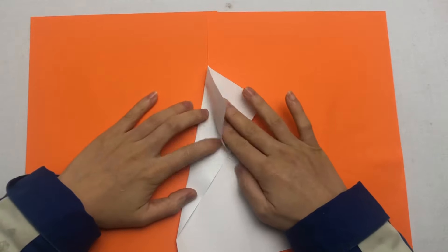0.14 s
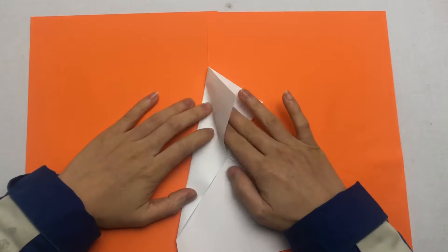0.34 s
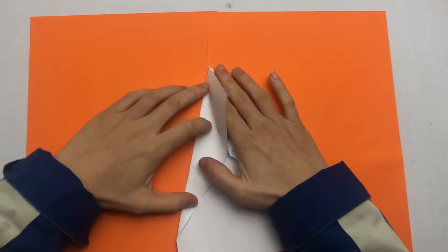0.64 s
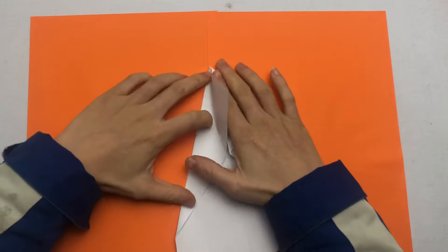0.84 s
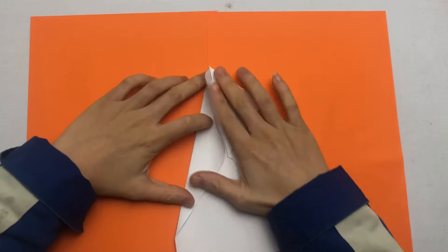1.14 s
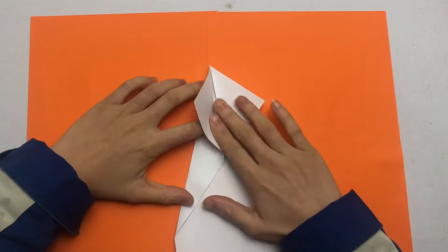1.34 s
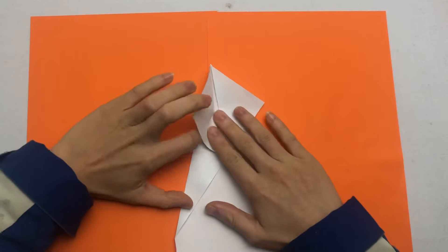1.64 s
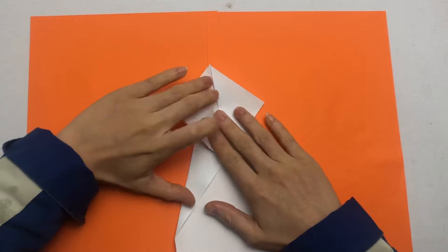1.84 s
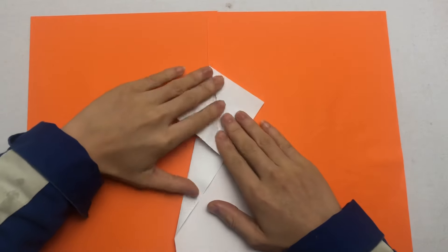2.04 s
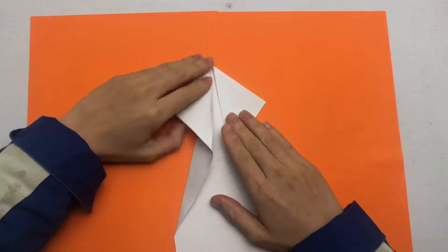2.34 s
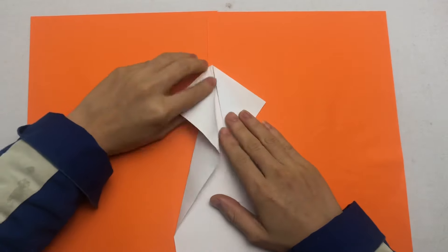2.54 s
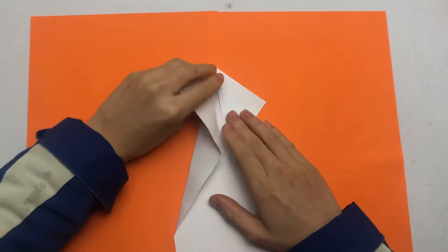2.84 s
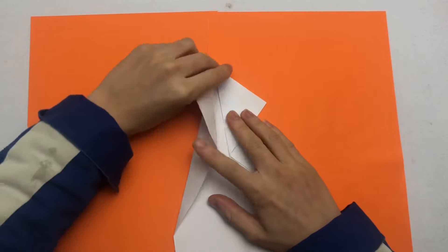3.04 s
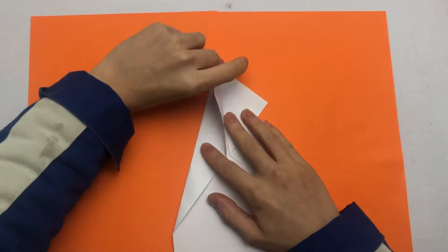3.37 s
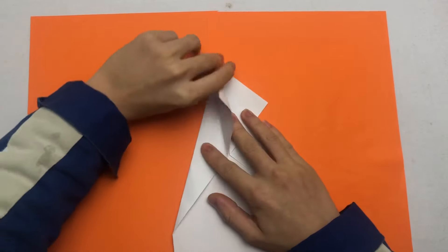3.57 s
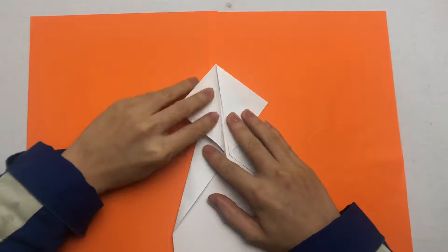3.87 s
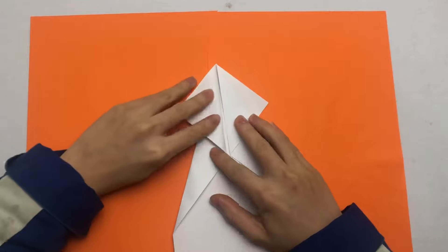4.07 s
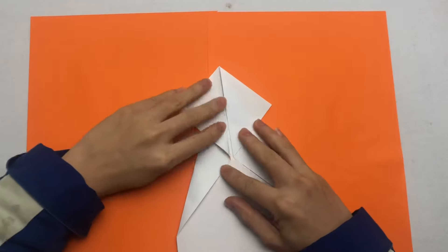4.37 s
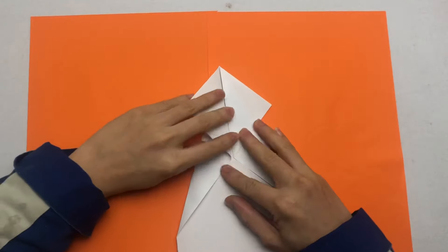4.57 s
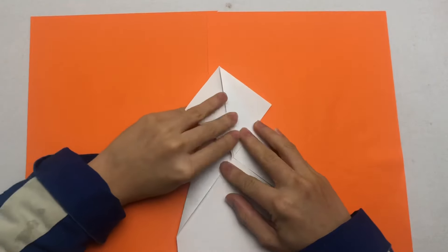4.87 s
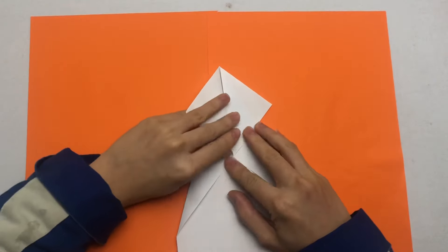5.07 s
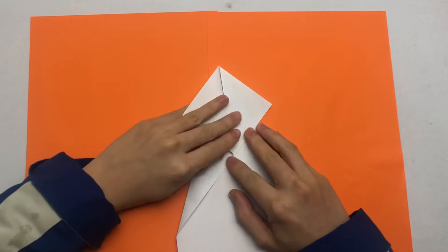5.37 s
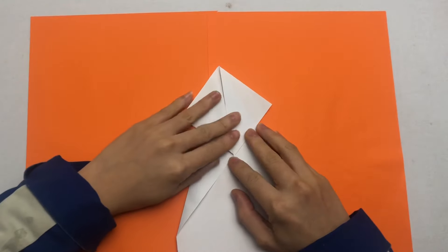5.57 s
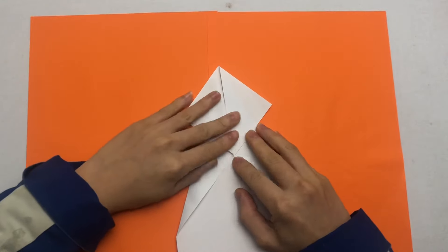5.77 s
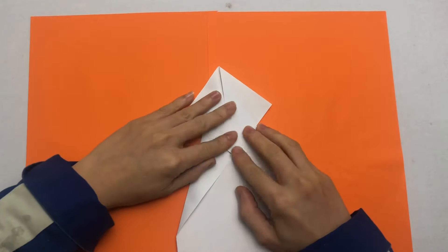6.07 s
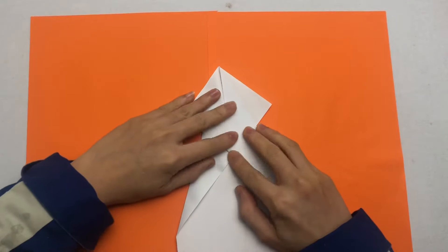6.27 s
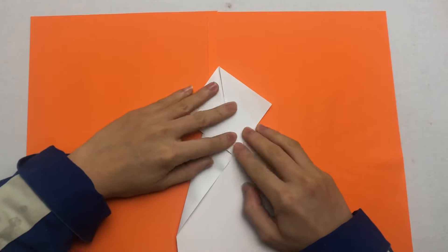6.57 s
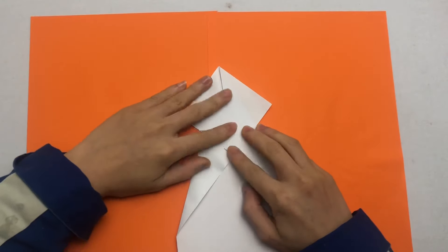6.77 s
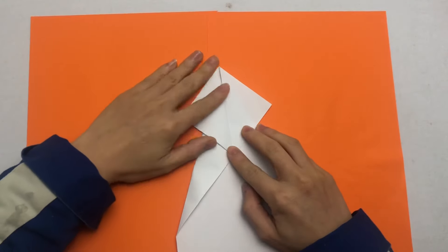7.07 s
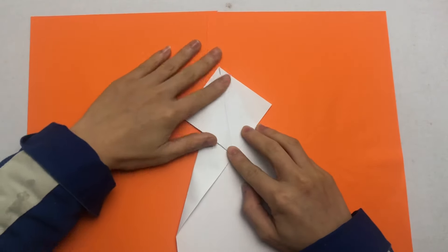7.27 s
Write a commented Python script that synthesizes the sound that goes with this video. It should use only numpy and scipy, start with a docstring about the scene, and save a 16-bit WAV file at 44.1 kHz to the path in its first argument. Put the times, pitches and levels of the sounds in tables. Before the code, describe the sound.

Two hands fold and press a sheet of paper on a table, heard close in a small quiet room. Brisk papery swishes and low hand rumble come first, then crackles, a sharp pop around two seconds and a dull table knock just after. Later the rubbing becomes softer and lighter, with a few small ticks and snaps.

```python
"""A fine-grained hiss of skin on paper comes first: two hands fold a sheet on a table, close to one microphone.
Sliding is a crowd of tiny random slips, coloured by hollows under the hands and shaped stroke by stroke.
The sheet snaps and its creases crunch as jolts and bursts of small breaks ring its resonances.
Underneath, the hands rumble, drag and knock on a ringing table top, and fingertips chatter.
The small, quiet room adds a faint diffuse tail to the paper."""
import sys
import numpy as np
from scipy import signal
from scipy.fft import rfft, irfft
from scipy.io import wavfile
from scipy.ndimage import uniform_filter1d

SR = 44100
rng = np.random.default_rng(int(sys.argv[2]) if len(sys.argv) > 2 else 0)


def materialize(psi):
    """Save the field psi as 16-bit PCM at rate SR to the path in sys.argv[1].

    A 1-D psi becomes a single channel; in a 2-D psi each row is a channel.
    """
    bounded = np.clip(np.atleast_2d(psi).T, -1, 1)
    quanta = np.round(bounded * 32767).astype(np.int16)
    wavfile.write(sys.argv[1], SR, quanta)


N = 326776
TIME, FREQS = np.arange(N) / SR, np.fft.rfftfreq(N, 1 / SR)


def amp(db):
    """Decibels to gain."""
    return 10 ** (np.asarray(db) / 20)


def evened(x):
    """Scales to rms 1."""
    return x / np.sqrt(np.mean(x ** 2) + 1e-20)


def decay(t, t60):
    """A fade that loses 60 dB in t60 seconds."""
    return np.exp(-np.log(1000) * t / t60)


def read(points, hz):
    """Reads a curve over frequency on a log-frequency axis."""
    f, value = np.transpose(points)
    return np.interp(np.log(hz + 1), np.log(f + 1), value)


def add(mix, s, sound):
    """Mixes a sound in at s seconds."""
    part = mix[max(round(s * SR), 0):][:len(sound)]
    part += sound[:len(part)]


def coloured(x, gain):
    """Filters by a gain for each frequency; rms 1."""
    return evened(irfft(rfft(x) * gain, N))


def waver(hz):
    """Slow random drift of rms 1, up to about hz."""
    return coloured(rng.standard_normal(N), 1 / (1 + (FREQS / hz) ** 4))


def resonate(x, hz, width_hz):
    """A resonance of gain 1 at a fixed or moving frequency: shift to 0 Hz, smooth, shift back."""
    turn = np.exp(2j * np.pi * np.cumsum(hz * np.ones(len(x))) / SR)
    r = np.exp(-np.pi * width_hz / SR)
    smoothed = signal.lfilter([1 - r], [1, -r], x / turn)
    return 2 * (turn * smoothed).real


def friction(per_s, spread_db, smooth):
    """Tiny slips of uneven size over a smooth hiss."""
    sizes = amp(spread_db * np.minimum(rng.exponential(1, N), 4)) * rng.choice([-1, 1], N)
    slips = evened(sizes * (rng.random(N) < per_s / SR))
    return evened(slips + smooth * rng.standard_normal(N))


# how long the room rings at each pitch: (f/Hz, t60/s)
ROOM_DECAY = [(1000, 0.8), (4000, 0.55), (9000, 0.38), (16000, 0.84)]


def room(x, gap_s=0.0029):
    """A diffuse noise tail after a short gap, with its own decay time at each frequency."""
    hz, t, z = signal.stft(rng.standard_normal(SR // 2), SR, nperseg=256)
    tail = signal.istft(z * decay(t, read(ROOM_DECAY, hz)[:, None]), SR, nperseg=256)[1]
    tail[:round(gap_s * SR)] = 0
    return signal.fftconvolve(x, tail / np.linalg.norm(tail))[:N]


# ringing modes of the table top: (f/Hz, relative level/dB, t60/s)
TABLE_MODES = [(54.7, -9.5, 0.39), (73.8, 0.5, 0.28), (87.8, 7.5, 0.29), (108.4, -2.5, 0.79),
               (126.8, -8.5, 0.66), (143.3, 4.5, 0.31), (162, -4, 0.3), (227, 7, 0.11), (273.5, 7.5, 0.14),
               (316, 2, 0.065), (396, 4.5, 0.19), (451, 14.5, 0.073), (650, 16, 0.039)]


def table_thud(contact_s):
    """The table top's answer to one soft push; the longer the contact, the duller."""
    t = np.arange(SR // 2) / SR
    ring = np.zeros(len(t))
    for k, (hz, db, t60) in enumerate(TABLE_MODES):
        ring += (-1) ** k * amp(db) * decay(t, t60) * np.sin(2 * np.pi * hz * t)
    push = np.sin(np.pi * np.minimum(t / contact_s, 1)) ** 2
    return signal.fftconvolve(ring, push)


# a hand leans on the table: (start t/s, length t/s, rumble level/dB)
HAND_LEANS = [(0.184, 0.11, -51.5), (0.475, 0.2, -51), (0.709, 0.16, -50), (0.968, 0.031, -51),
              (1.066, 0.22, -51), (1.748, 0.14, -56.5), (2.029, 0.065, -56), (2.87, 0.48, -60.5),
              (3.44, 0.24, -59), (4.395, 0.37, -60.5), (5.06, 0.13, -56), (5.324, 0.17, -53.5),
              (5.69, 0.059, -51), (6.12, 0.23, -60.5)]
LEAN_ATTACK_S, LEAN_T60_S, RESTING_WEIGHT_DB = 0.028, 0.34, -66


def weight_db():
    """The weight of the hands as a rumble level: each lean comes on quickly, holds and eases off."""
    power = amp(RESTING_WEIGHT_DB) ** 2 * np.ones(N)
    t = np.arange(SR) / SR
    for s, length_s, db in HAND_LEANS:
        lean = np.minimum(t / LEAN_ATTACK_S, 1) * decay(np.maximum(t - length_s, 0), LEAN_T60_S)
        add(power, s, (amp(db) * lean) ** 2)
    return 10 * np.log10(power)


# dull colour of dragging skin, also used by the chatters: (f/Hz, relative level/dB)
SKIN_COLOUR = [(110, -19), (160, 0), (230, 0.5), (340, -5), (430, -2), (560, -8.5), (1400, -20.5)]


def pressing(contact_s=0.0087, drag_db=-41, drag_share=0.41):
    """The hands shake the table top; the dull drag of the skin grows with their weight."""
    rumble_db = weight_db()
    rumble = coloured(rng.standard_normal(N), abs(rfft(table_thud(contact_s), N)))
    # flatten the chance swells, so that the overall level follows the weight
    rumble /= np.sqrt(uniform_filter1d(rumble ** 2, size=2400) + 0.035)
    # the fingers shift in small separate shoves
    rumble = evened(rumble * amp(1.5 * waver(12.0)))
    drag = coloured(rng.standard_normal(N), amp(read(SKIN_COLOUR, FREQS)) * (FREQS < 1400))
    # the drag gains only drag_share dB for each dB of rumble
    return amp(rumble_db) * rumble + amp(drag_db + drag_share * rumble_db) * drag


# a finger or the heel of a hand lands on the table, or a snap of the sheet jolts it: (t/s, peak level/dB,
# contact t/s)
HAND_KNOCKS = [(0.244, -51.5, 0.0042), (0.286, -41, 0.0079), (0.653, -48, 0.0036), (.76, -46, 0.0013),
               (0.786, -43.5, 0.0025), (1.176, -42, 0.0022), (1.473, -56, .002), (1.547, -48.5, 0.00071),
               (1.774, -50, 0.0015), (1.853, -43.5, 0.0022), (2.341, -28.5, 0.0039), (2.35, -33, 0.0054),
               (2.3996, -38.5, 0.0055), (2.457, -44, 0.005), (3.448, -45, 0.0062), (3.912, -48.5, 0.0092),
               (4.531, -49.5, 0.0037), (5.089, -51.5, 0.0044), (5.344, -50, 0.0022), (5.421, -48, 0.002),
               (5.473, -44.5, 0.0058), (5.722, -47, 0.0015), (6.02, -50.5, 0.0049), (6.268, -46, 0.0017),
               (6.65, -44, 0.0088), (6.663, -58, .0016), (6.706, -58, 0.0074), (7.085, -50.5, 0.012)]


def knocks():
    """Soft blows ring the table."""
    out = np.zeros(N)
    for s, db, contact_s in HAND_KNOCKS:
        thud = table_thud(contact_s)
        add(out, s, amp(db) * thud / abs(thud).max())
    return out


# a fingertip sticks and chatters briefly: (middle t/s, length t/s, level/dB, f/Hz)
FINGER_CHATTERS = [(0.201, 0.17, -62, 417), (0.582, 0.073, -58.5, 400), (0.65, 0.038, -64, 867),
                   (0.717, 0.026, -56, 880), (0.744, 0.078, -56, 323), (1.101, .085, -53.5, 413),
                   (1.189, 0.053, -52.5, 430), (6.175, 0.18, -76, 950)]


def chatters(groan_width_hz=100, squeak_width_hz=55, squeak_from_hz=700, scrape_share=0.81, scrape_tilt=0.24):
    """Uneven slips of skin on paper ring one narrow resonance; low ones also scrape in little bumps."""
    out = np.zeros(N)
    scrape_colour = amp(read(SKIN_COLOUR, FREQS)) * FREQS ** scrape_tilt * (FREQS < 1100)
    scrape = coloured(friction(per_s=280, spread_db=4.0, smooth=0.78), scrape_colour)
    for s, length_s, db, hz in FINGER_CHATTERS:
        slips = rng.standard_normal(round(length_s * SR))
        low = hz < squeak_from_hz
        width = groan_width_hz if low else squeak_width_hz
        # two passes make the resonance steeper
        voice = evened(resonate(resonate(slips, hz, width), hz, width))
        if low:
            voice += scrape_share * evened(scrape[round(s * SR):][:len(slips)])
        faded = voice * signal.windows.tukey(len(slips), .5)
        add(out, s - length_s / 2, amp(db) * evened(faded))
    return out


def patchy(x, depth_db, fade_hz=8000):
    """As the sheet bends, narrow resonances come and go at random, less so in the treble."""
    hz, _, z = signal.stft(x, SR, nperseg=1024)
    field = uniform_filter1d(rng.standard_normal(z.shape), size=4, axis=0)  # smooth over frequency
    field = uniform_filter1d(field, size=9, axis=1)  # smooth over time
    gain_db = depth_db * evened(field) / np.hypot(1, hz / fade_hz)[:, None]
    return signal.istft(z * amp(gain_db), nperseg=1024)[1][:N]


# a finger or a flap slides over the sheet, levels before the trim in sliding():
# (start t/s, length t/s, speeding up t/s, rasp level/dB, brightness level/dB)
SLIDE_STROKES = [(0.0, 0.31, 0.12, -53.5, 0.5), (0.245, 0.35, 0.077, -54, 1.5),
                 (0.388, 0.35, 0.13, -52.5, 0.05), (0.684, 0.31, 0.13, -54, -1.5),
                 (0.989, 0.48, 0.22, -49, 1.1), (1.37, 0.26, 0.091, -55, 0), (1.604, 0.082, .02, -58, 0.5),
                 (1.733, 0.081, 0.026, -50.5, 0), (1.737, 0.26, 0.016, -58.5, -0.5),
                 (1.885, 0.26, 0.16, -55, 0.5), (2.131, 0.28, 0.029, -54.5, -0.1),
                 (2.339, 0.57, .016, -59, 1), (2.561, 0.26, 0.031, -54, 1),
                 (2.731, 0.13, 0.12, -54.5, -0.7), (2.849, 0.58, 0.013, -62, -0.5),
                 (3.121, 0.23, 0.046, -57, -2), (3.457, 0.19, 0.018, -61, -1),
                 (3.602, 0.36, 0.014, -52.5, 1), (3.902, 0.63, 0.26, -61, 0.3), (4.34, 0.46, 0.086, -58, 1),
                 (4.507, 0.51, 0.3, -61, -1.2), (4.941, 0.1, 0.068, -59.5, 1),
                 (5.049, 0.093, 0.04, -59, -0.8), (5.082, 0.53, 0.42, -59, -0.5),
                 (5.724, 0.11, 0.013, -67, -1), (5.928, 0.14, 0.027, -63, 2),
                 (6.14, 0.07, 0.044, -59.5, 1.5), (6.238, 0.23, 0.049, -60, 0), (6.42, 0.46, 0.31, -61, 1),
                 (6.744, 0.44, 0.1, -57, 2), (6.925, 0.14, 0.058, -55, 1.3), (7.153, 0.55, 0.044, -58, 1.7)]
# hands lying almost still, before the same trim: level/dB of body, rasp, fine hiss
REST_LEVELS = [-72.5, -73.5, -74]
SAG_DB, STOP_S = 8, 0.1  # every stroke slows on its way, then comes to a stop
BODY_DB, BODY_PER_BRIGHT = -5, 3.4  # a light, bright stroke hardly moves the body of the sheet


def stroke_levels():
    """Body, rasp and fine hiss in dB: each stroke speeds up, slows and stops."""
    power = amp(REST_LEVELS)[:, None] ** 2 * np.ones(N)
    for s, length_s, rise_s, db, bright_db in SLIDE_STROKES:
        t = np.arange(0, length_s, 1 / SR)
        rise = np.sin(np.pi / 2 * np.minimum(t / rise_s, 1))
        stop = np.sin(np.pi / 2 * np.minimum((length_s - t) / STOP_S, 1))
        sag = amp(-SAG_DB * np.interp(t, [min(rise_s, length_s), length_s], [0, 1]))
        speed = rise * stop * sag
        tilts_db = (BODY_DB - BODY_PER_BRIGHT * bright_db, 0, bright_db)
        for band, tilt_db in zip(power, tilts_db):
            add(band, s, (amp(db + tilt_db) * speed) ** 2)
    return 10 * np.log10(power)


# a hollow under a hand or a lifted flap rings for one stroke:
# (middle t/s, length t/s, centre f/Hz, boost level/dB)
HOLLOWS = [(0.436, 0.32, 3900, 8), (2.42, 1, 8500, 4), (2.625, 0.45, 3080, 9), (2.85, 1, 1750, 9.5),
           (4.13, 0.066, 3650, 19), (4.237, 1, 3200, 6.5), (4.744, 1, 5160, 5.5), (5.196, 0.79, 1620, 8.5)]
HOLLOW_WANDER, WANDER_HZ = 0.028, 7.1  # the hollows change size as the hands move: rms share, rate
# colour of sliding paper: (f/Hz, relative level/dB)
PAPER_COLOUR = [(320, -42), (550, -8), (899, -10), (1020, -10.5), (1330, -8), (1620, -6.5), (2090, -9.5),
                (2580, -7), (3140, -5), (5510, -5), (7000, -4), (8500, -0.5), (10400, -4), (14500, -6.5),
                (15800, -13.5)]
# body, rasp and fine hiss of the slide: (low f/Hz, high f/Hz)
HISS_BANDS = [(500, 2300), (2300, 6500), (6500, 20000)]


def sliding(judder_db=1.56, judder_hz=20.7, patchy_db=2.2, trim_db=-0.5):
    """Paper fibres catch and slip; the hollows under hands and flaps colour the hiss."""
    slips = patchy(friction(per_s=3000, spread_db=3.5, smooth=2.16), depth_db=patchy_db)
    slips = slips * amp(judder_db * waver(judder_hz))
    hiss, shift = slips.copy(), 1 + HOLLOW_WANDER * waver(WANDER_HZ)
    for s, length_s, hz, db in HOLLOWS:
        swell = np.cos(np.pi * np.clip((TIME - s) / length_s, -.5, .5)) ** 2
        hiss += (amp(db) - 1) * swell * resonate(slips, hz * shift, width_hz=0.12 * hz)
    colour, out = amp(read(PAPER_COLOUR, FREQS)), np.zeros(N)
    for (lo, hi), level_db in zip(HISS_BANDS, stroke_levels()):
        band = 1 / (1 + (lo / (FREQS + 1)) ** 10) / (1 + (FREQS / hi) ** 10)
        out += amp(level_db + trim_db) * coloured(hiss, band * colour)
    return out


# resonances of the folded sheet: (f/Hz, width f/Hz, relative level/dB)
SHEET_MODES = [(1180, 230, -1.5), (1680, 210, 0), (2410, 240, -2.5), (3030, 570, 0.5), (3440, 480, 1),
               (3890, 240, -1.5), (5130, 250, -26), (7800, 5900, -9.5)]
# a snap or crunch comes back from nearby surfaces: (delay t/s, gain)
NEAR_ECHOES = [(.00132, 0.2), (.00185, 0.08), (.0039, .3)]
# body, crack and edge of a snap or crunch: (low f/Hz, high f/Hz)
CRACK_BANDS = [(950, 2000), (2000, 5000), (5800, 16000)]


def sheet(push, levels_db, detune, top_hz):
    """A push rings the sheet, whose resonances shift as it bends; near surfaces answer at once."""
    shifts = 1 + detune * (2 * rng.random(len(SHEET_MODES)) - 1)
    ring = sum(amp(db) * resonate(push, hz * k, width) for (hz, width, db), k in zip(SHEET_MODES, shifts))
    ring = signal.sosfilt(signal.butter(2, top_hz, fs=SR, output="sos"), ring)
    heard, out = ring.copy(), 0
    for delay_s, gain in NEAR_ECHOES:
        add(heard, delay_s * (1 + detune * rng.uniform(-1, 1)), gain * ring)
    for k, (band, db) in enumerate(zip(CRACK_BANDS, levels_db)):
        part = signal.sosfilt(signal.butter(2, band, "bandpass", fs=SR, output="sos"), heard)
        # the band's whole energy, spread over 10 ms, gives rms 1
        part = part * np.sqrt(SR / 100 / np.sum(part ** 2))
        out = out + (-1) ** k * amp(db) * part  # neighbouring bands have opposite polarity
    return out


# a crease gives way fibre by fibre, or a quick flick brushes the sheet, levels as rms over 10 ms: # (t/s, body
# level/dB, crack level/dB, edge level/dB, build-up t/s)
CREASE_CRUNCHES = [(0.979, -56, -68, -57, 0.0054), (1.234, -52.5, -54, -55, 0.012),
                   (1.5487, -45, -44.5, -43, 0.0095), (1.655, -72, -60, -53, 0.027),
                   (1.7694, -41, -55, -41, 0.0014), (1.849, -40, -46.5, -36.5, 0.0021),
                   (2.338, -51.5, -80, -49.5, 0.0011), (2.675, -53, -47, -62, 0.0058),
                   (2.784, -52.5, -67, -54, 0.0059), (2.834, -56, -57, -67, 0.03),
                   (3.137, -48.5, -76, -52.5, 0.0071), (3.155, -55, -58, -51.5, 0.014),
                   (3.184, -41, -55, -49.5, 0.012), (3.565, -54.5, -65, -59, 0.011),
                   (3.627, -47, -56, -49, 0.024), (3.655, -45.5, -62, -48, 0.039),
                   (3.752, -58.5, -56, -60, 0.0034), (3.9044, -61, -50, -53.5, 0.0079),
                   (4.14, -57, -48.5, -51.5, 0.0096), (6.388, -85, -89, -57, 0.022),
                   (6.858, -55.5, -80, -53, 0.0078)]


def crunches(release_t60=0.031):
    """A burst of small breaks swells until the crease gives or the flick passes, then dies."""
    out, t = np.zeros(N), np.arange(-SR // 20, SR // 20) / SR
    breaks = friction(per_s=5000, spread_db=3.0, smooth=0.32)
    for s, *levels_db, build_s in CREASE_CRUNCHES:
        swell = np.exp(2 * np.minimum(t, 0) / build_s) * decay(np.maximum(t, 0), release_t60)
        push = swell * breaks[round(s * SR):][:len(t)]
        add(out, s + t[0], sheet(push, levels_db, detune=0.049, top_hz=15500))
    return out


# the sheet buckles, levels as rms over 10 ms before the trim in snaps():
# (t/s, body level/dB, crack level/dB, edge level/dB, panel ring f/Hz)
SHEET_SNAPS = [(0.7586, -40.5, -42, -38, 1300), (1.472, -42, -32, -46, 2620),
               (2.038, -28.5, -28, -39.5, 1700), (2.1323, -37, -34.5, -57, 1720),
               (2.61, -53, -62, -45, 8350), (2.974, -50, -87, -70, 1500), (4.5263, -45.5, -42.5, -56, 1670),
               (4.614, -50, -58, -51, 1690), (5.825, -80, -92, -64.5, 9000),
               (6.2668, -46, -37.5, -43, 5500), (6.7144, -54, -55, -50, 2760)]


def snaps(jolt=1.1, flutter_t60=0.023, panel_db=6, panel_width=0.19, trim_db=-1):
    """The sheet flips through in one jolt, then flutters briefly; the panel that flips adds its own ring."""
    out, t = np.zeros(N), np.arange(SR // 20) / SR
    for s, *levels_db, hz in SHEET_SNAPS:
        flutter = rng.standard_normal(len(t)) * decay(t, flutter_t60)
        push = flutter / np.linalg.norm(flutter)
        push[0] += jolt  # size against the flutter
        push = push + (amp(panel_db) - 1) * resonate(push, hz, panel_width * hz)
        add(out, s, sheet(push, levels_db, detune=0.02, top_hz=9100))
    return amp(trim_db) * out


def scene(room_db=-13):
    """Paper with its room tail, and table, the same in both ears."""
    paper = snaps() + crunches() + sliding()
    mix = paper + amp(room_db) * room(paper) + pressing() + chatters() + knocks()
    return np.array([mix, mix])


def record(dry, bass_hz=50, edge_hz=15950):
    """The microphone sheds deep bass; then a steep low-pass limits the band."""
    thinned = signal.sosfilt(signal.butter(3, bass_hz, "highpass", fs=SR, output="sos"), dry)
    band_limit = signal.firwin(511, edge_hz, window=("kaiser", 9), fs=SR)
    return signal.oaconvolve(thinned, band_limit[None], "same")


dry = scene()
out = record(dry)
materialize(out)
```